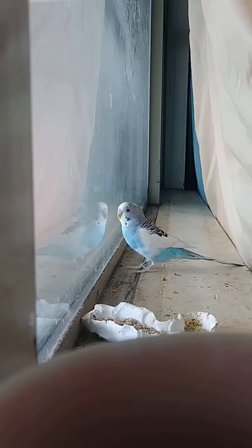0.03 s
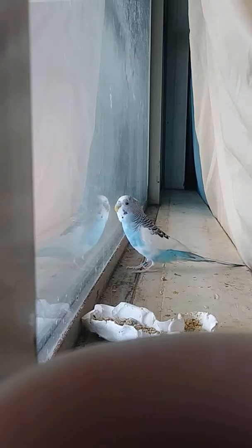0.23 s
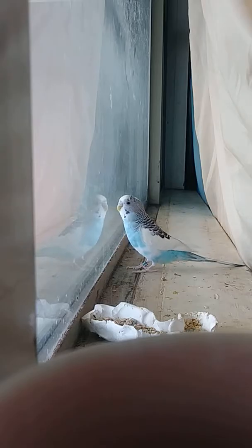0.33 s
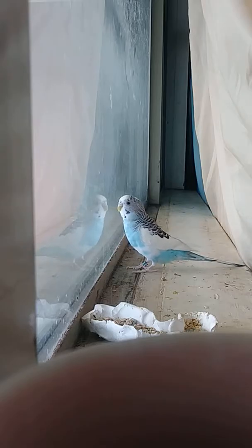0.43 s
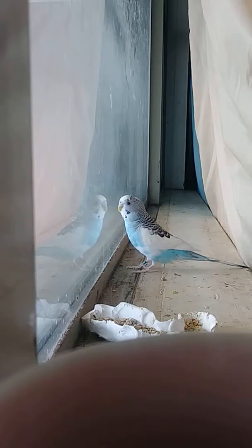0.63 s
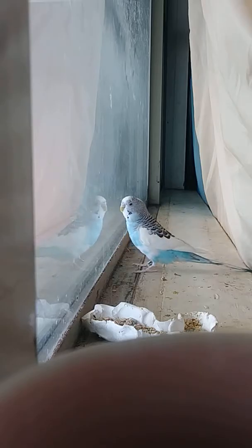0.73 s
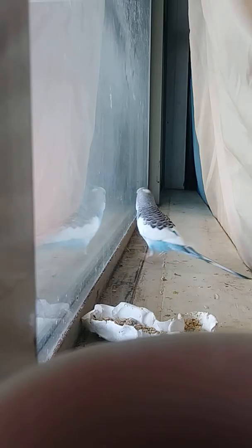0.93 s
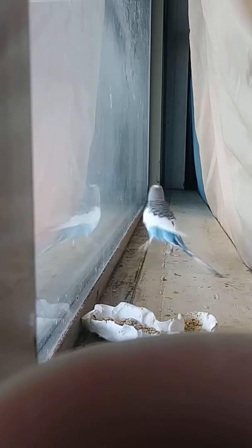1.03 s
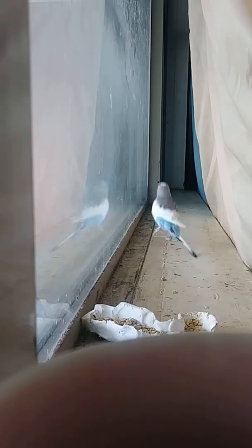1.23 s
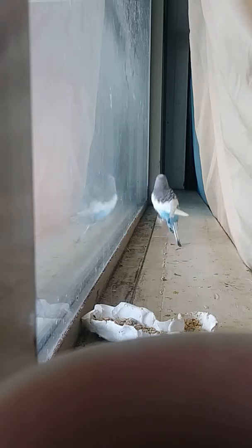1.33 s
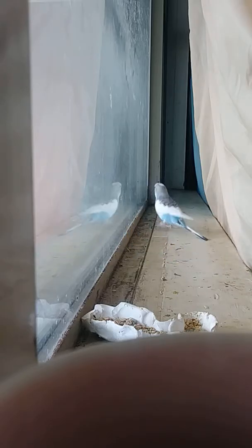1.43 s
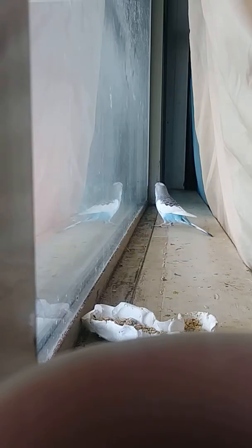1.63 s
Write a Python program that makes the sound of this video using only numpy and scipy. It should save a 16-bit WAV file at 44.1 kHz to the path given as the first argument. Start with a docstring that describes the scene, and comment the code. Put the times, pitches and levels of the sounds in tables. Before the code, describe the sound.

A budgerigar chirps twice, loud and close, on a window sill in a quiet small room. At about 0.2 s a bright whistle arches, tumbles in raspy falls and ends on a high note by 0.36 s. A similar chirp, duller and roomier, follows at 0.95-1.1 s. Short reverberation trails each. Faint claw taps and scuffs come around 1.2-1.3 and 1.45 s, over barely audible low room noise.

```python
"""Faint room noise runs throughout; through it swell and fade a low wavering hum and thin far-off tones (sines).
A budgerigar on a window sill chirps twice, close by: a whistle with overtones that arches, tumbles in
three rasping falls and ends on a held high note. It turns away for the second chirp, duller and roomier.
Sill, pane, frame and a small quiet room echo it (delays, then decaying noise).
Last, its feet tap the sill: noise scratches and scuffs, with faint ringing modes."""
import sys
import numpy as np
from scipy import signal
from scipy.fft import rfft, irfft
from scipy.io import wavfile
from scipy.ndimage import uniform_filter1d, minimum_filter1d

SR = 44100
rng = np.random.default_rng(int(sys.argv[2]) if len(sys.argv) > 2 else 0)


def wav_out(sig):
    """Save sig, one row per channel (or a flat mono array), as 16-bit PCM at SR to the path in sys.argv[1]."""
    wavfile.write(sys.argv[1], SR, np.round(np.clip(np.atleast_2d(sig).T, -1, 1) * 32767).astype(np.int16))


N = 74970
T = np.arange(N) / SR

# Echoes of sill, pane and frame. Each row: delay in seconds, level in dB re direct sound.
ECHOES = [(.0013, -19.5), (.0052, -10), (.0094, -6.5)]


def amp(db):
    """Decibels to gain."""
    return 10 ** (np.asarray(db) / 20)


def unit(x):
    """Scale to rms 1."""
    return x / np.sqrt(np.mean(x ** 2))


def on_log_axis(hz, points):
    """Read (Hz, value) points at any frequency, linear in log frequency."""
    point_hz, value = np.array(points, float).T
    return np.interp(np.log(np.maximum(hz, 1)), np.log(point_hz), value)


def colour(x, points):
    """Minimum-phase filter with the given (Hz, dB) response, by folding the cepstrum."""
    size = 2 * N
    gain = amp(on_log_axis(np.fft.rfftfreq(size, 1 / SR), points))
    cepstrum = irfft(np.log(gain))
    cepstrum[1:N] *= 2
    cepstrum[N + 1:] = 0
    response = np.exp(rfft(cepstrum))
    return irfft(rfft(x, size) * response)[:N]


def lowpass(x, order, hz):
    """Butterworth low-pass."""
    return signal.sosfilt(signal.butter(order, hz, fs=SR, output="sos"), x)


def wobble(hz):
    """Random motion mostly slower than hz, rms 1."""
    return unit(lowpass(rng.standard_normal(N), 2, hz))


def decay(t60_s):
    """Exponential fade from time 0, losing 60 dB in t60_s."""
    return np.exp(-np.log(1000) * T / t60_s)


def background():
    """Steady coloured room noise, with faint sines of wavering pitch under Gaussian swells."""
    # Spectrum of the room noise. Each row: frequency in Hz, relative density in dB per Hz.
    floor_colour = [(25, -32), (60, -19.5), (140, -9), (230, 1), (330, 0.5), (480, -9.5), (800, -9),
                    (1150, -10), (1600, -20), (2200, -16.5), (2900, -23.5), (4600, -22.5), (6200, -32.5),
                    (13000, -34), (14500, -33), (16000, -41.5)]
    # Low hum and thin far-off tones. Each row: centre in seconds, time from centre to -50 dB in seconds,
    # mean pitch in Hz, peak level in dB.
    swells = [(0.16, 0.053, 318, -56), (0.53, .06, 245, -60), (0.674, 0.028, 303, -58.5),
              (0.764, 0.066, 234, -48.5), (0.8, .035, 237, -50.5), (1.26, .04, 330, -59),
              (1.303, 0.024, 239.5, -52.5), (1.47, 0.048, 337, -59.5), (0.011, 0.046, 1140, -65.5),
              (0.739, 0.084, 1149, -72.5), (1.305, 0.02, 1270, -63), (0.046, 0.03, 2210, -66),
              (0.781, 0.14, 2125, -75), (1.345, 0.19, 2122, -69.5), (1.626, 0.21, 2135, -68),
              (1.683, 0.05, 1305, -66), (1.212, 0.013, 1100, -59.5), (0.767, 0.026, 4400, -69.5),
              (1.628, .12, 85, -69)]
    floor_db = -68
    waver_share, waver_hz = .02, 71
    out = amp(floor_db) * unit(colour(rng.standard_normal(N), floor_colour))
    for centre_s, length_s, hz, db in swells:
        pitch_hz = hz * (1 + waver_share * wobble(waver_hz))
        phase = 2 * np.pi * np.cumsum(pitch_hz) / SR
        swell = np.exp(-2 * ((T - centre_s) / length_s * 1.7) ** 2)
        out = out + amp(db) * swell * np.sin(phase)
    return out


def room(near, sent):
    """Dense first echoes of the window recess, then a diffuse tail fading at its own rate in each band."""
    # Reverberation. Each row: frequency in Hz, t60 in seconds.
    t60_points = [(200, .35), (1300, .36), (1850, .3), (2200, .36), (2700, 0.33), (3600, 0.32),
                  (5000, 0.36), (7000, 0.23), (15000, 0.43)]
    tail_db, tail_gap_s = -14, .0091
    early_db, early_t60_s = -16, .05
    hz, frame_s, bins = signal.stft(rng.standard_normal(N), SR, nperseg=256)
    fade = np.exp(-np.log(1000) * frame_s / on_log_axis(hz, t60_points)[:, None])
    tail = signal.istft(bins * fade, SR)[1][:N] * (T > tail_gap_s)
    early = rng.standard_normal(N) * decay(early_t60_s) * (T > ECHOES[0][0])
    response = amp(tail_db) * unit(tail) + amp(early_db) * unit(early)
    # sqrt(N) brings each unit-rms part to unit energy
    return near + signal.fftconvolve(sent, response)[:N] / np.sqrt(N)


def feet():
    """Each tap of foot or claw is a short scratch, a softer scuff and a faint ring of the sill."""
    # Each row: start in seconds, level in dB, tilt of the scratch in dB per octave about 3 kHz.
    taps = [(1.216, -59, 6), (1.286, -54, 11), (1.435, -41.5, -5), (1.443, -49, -8.5), (1.467, -43.5, 5.5)]
    # Scratch spectrum before tilt. Each row: frequency in Hz, gain in dB.
    tap_colour = [(60, -62), (250, -38), (800, -17.5), (1600, -13), (2600, -1.5), (4200, -8), (6500, -31),
                  (10000, -53), (15000, -36)]
    # Sill modes. Each row: frequency in Hz, level in dB re tap level, t60 in seconds.
    sill_modes = [(483.4, -12.5, 0.19), (1100, -12, 0.15), (1164, -17, 0.14), (1530, -27.5, 0.28),
                  (2112, -16.5, 0.17), (4950, -18.5, 0.29)]
    scratch_decay_s, scuff_decay_s, scuff_db = .0031, .012, -2.5
    sill_rise_s = .0018
    out = np.zeros(N)
    for start_s, db, tilt_db in taps:
        age_s = np.maximum(T - start_s, 0)
        envelope = np.exp(-age_s / scratch_decay_s) + amp(scuff_db) * np.exp(-age_s / scuff_decay_s)
        scratch = rng.standard_normal(N) * envelope * (T >= start_s)
        tilted = [(hz, gain_db + tilt_db * np.log2(hz / 3000)) for hz, gain_db in tap_colour]
        scratch = colour(scratch, tilted)
        ring = sum(amp(mode_db - 60 * age_s / t60_s) * np.sin(2 * np.pi * hz * age_s)
                   for hz, mode_db, t60_s in sill_modes)
        ring = ring * (1 - np.exp(-age_s / sill_rise_s))
        out += amp(db) * (2 * scratch + ring)
    return out


def strand(curve):
    """Unbroken syrinx whistle; roughness shakes pitch and level, adds overtones, noise and a half tone."""
    # Each row: multiple of the pitch, level in dB re whistle when clean, the same when fully rough.
    overtones = [(2, -17, -3.5), (3, -22.5, -16.5), (4, -31.5, -36.5)]
    # unsteadiness at full roughness, as a share
    jitter_share, jitter_hz, flutter_share, flutter_hz = .085, 800, .65, 600
    # re whistle; half tone and rasp noise at full roughness, air noise steady
    half_tone_db, rasp_db, air_db = -13, -18.5, -35.5
    fade_s = .0065  # just outside each end, so neighbouring strands overlap
    s, hz, db, rough = curve.T
    rough = np.interp(T, s, rough)

    inside_s = np.minimum(T - s[0], s[-1] - T)
    gate = np.sin(np.pi / 2 * np.clip(inside_s / fade_s + 1, 0, 1)) ** 2
    flutter = 1 + flutter_share * rough * wobble(flutter_hz)
    force = amp(np.interp(T, s, db)) * gate * flutter

    pitch_hz = np.interp(T, s, hz) * (1 + jitter_share * rough * wobble(jitter_hz))
    phase = 2 * np.pi * np.cumsum(pitch_hz) / SR
    half_tones = np.sin(phase / 2) + .5 * np.sin(1.5 * phase)
    tone = np.sin(phase) + amp(half_tone_db) * rough * half_tones
    for multiple, clean_db, rough_db in overtones:
        tone = tone + amp(clean_db + (rough_db - clean_db) * rough) * np.sin(multiple * phase)
    noise = (amp(air_db) + amp(rasp_db) * rough) * rng.standard_normal(N)
    return force * (tone + noise)


def chirp(curve):
    """At each upward leap the voice breaks: one strand dies as the next sets in."""
    leap_ratio = 1.28
    curve = np.array(curve)
    leaps = np.flatnonzero(curve[1:, 1] > leap_ratio * curve[:-1, 1]) + 1
    return sum(strand(part) for part in np.split(curve, leaps))


def budgerigar():
    """Both chirps through throat and beak: the sound near the sill and the sound sent into the room."""
    # The two chirps. Each row: time in seconds, pitch in Hz, whistle level in dB before the throat,
    # roughness 0-1.
    first_curve = [(.216, 3300, -29, .1), (.221, 3381, -21, 0.2), (.229, 3682, -11, 0.11),
                   (.239, 2777, -15, 0.54), (.248, 2667, -7.5, 0.77), (.251, 4045, -10, 0.18),
                   (.260, 3711, -10.5, 0.5), (.265, 2137, -17.5, 0.36), (.271, 1739, -3.5, 0.6),
                   (.281, 1876, -4, 0.85), (.284, 3683, -15, 0.54), (.290, 2882, -11, 0.65),
                   (.301, 2787, -10, .4), (.306, 3717, -5, 0.18), (.312, 3653, -7.5, 0.07),
                   (.327, 3516, -16, 0.2), (.339, 3720, -5, 0), (.349, 3470, -20.5, 0.14),
                   (.360, 3596, -35.5, .05)]
    second_curve = [(.946, 3128, -30, .1), (0.949, 3292, -23, 0.2), (0.965, 3659, -10.5, 0.14),
                    (0.971, 3332, -10, 0.01), (0.976, 2708, -8.5, 0), (.983, 2732, -1.5, 0),
                    (.985, 4100, -14.5, 0.6), (.993, 3564, -16, 0.2), (.999, 2719, -9, 0.29),
                    (1.005, 2001, -4.5, 0.65), (1.016, 1767, -15.5, 0.4), (1.022, 3118, -16.5, 0.75),
                    (1.036, 2891, -12, 0.2), (1.041, 3416, -12, 0.2), (1.047, 3631, -12, 0.12),
                    (1.063, 3525, -20.5, 0.3), (1.077, 3567, -15, 0.17), (1.089, 3523, -19.5, 0.17),
                    (1.097, 3487, -41, 0.2)]
    # Colour of throat and beak. Each row: frequency in Hz, gain in dB.
    throat = [(100, -49.5), (1000, -43), (1400, -18.5), (1830, -5.5), (2050, -3), (2230, -6.5), (2400, 0),
              (2800, 0.5), (3750, 2.5), (4500, -10), (5500, -14), (6500, -25.5), (7700, -21.5), (9500, -31),
              (11200, -23), (12600, -37.5), (14500, -27), (16000, -33)]
    # second chirp, bird turned away: duller treble, lifted top, more room
    treble_db, top_db, room_db = -5, 10, 2
    first = colour(chirp(first_curve), throat)
    second = colour(chirp(second_curve), throat)
    turned = colour(second, [(3900, 0), (5200, treble_db), (11500, treble_db), (14000, top_db)])
    hz = np.fft.rfftfreq(N, 1 / SR)
    surfaces = 1 + sum(amp(db) * np.exp(-2j * np.pi * hz * delay_s) for delay_s, db in ECHOES)
    near = irfft(rfft(first + turned) * surfaces, N)
    sent = first + amp(room_db) * turned
    return near, sent


def scene():
    """The bird and its feet in the room, over the background."""
    near, sent = budgerigar()
    taps = feet()
    return (room(near + taps, sent + taps) + background())[None]


def record(dry):
    """A limiter holds down peaks, the loudest positive peaks add a faint dull pop, and the top is cut."""
    ceiling, limiter_s = .97, .00089  # peak sample value; span over which the gain moves
    pop_from, pop_db, pop_hz = .82, -15.5, 1300  # sample value where it begins, level, cut-off
    top_hz = 15700
    size = max(int(limiter_s * SR), 3)
    needed_gain = ceiling / np.maximum(np.abs(dry), ceiling)
    gain = uniform_filter1d(minimum_filter1d(needed_gain, size), size)
    excess = np.clip(dry - pop_from, 0, .1)  # positive peaks only
    pop = amp(pop_db) * lowpass(excess, 4, pop_hz)
    top_cut = signal.ellip(10, .1, 80, top_hz, fs=SR, output="sos")
    return signal.sosfilt(top_cut, dry * gain + pop)


dry = scene()
out = record(dry)
wav_out(out)
```